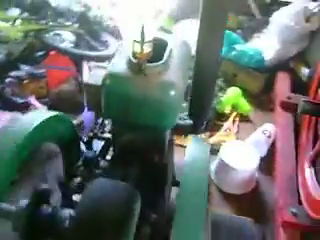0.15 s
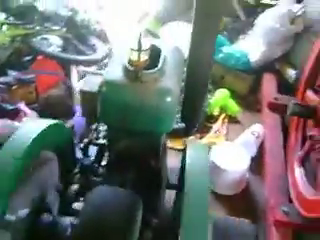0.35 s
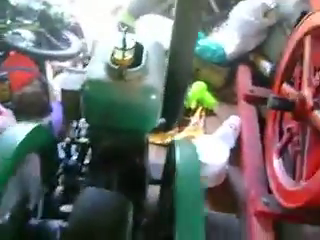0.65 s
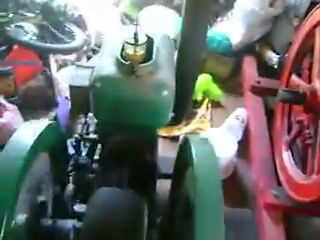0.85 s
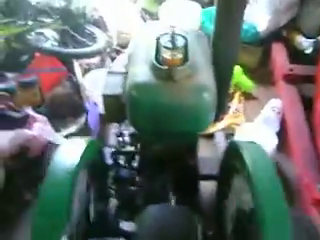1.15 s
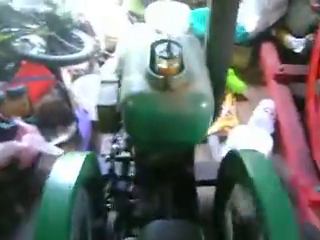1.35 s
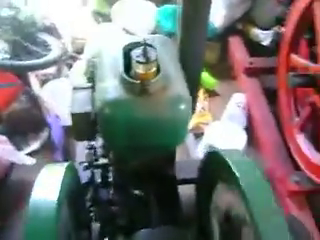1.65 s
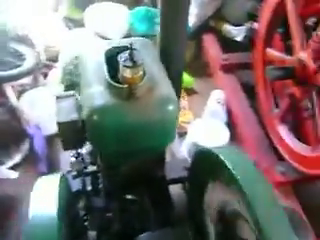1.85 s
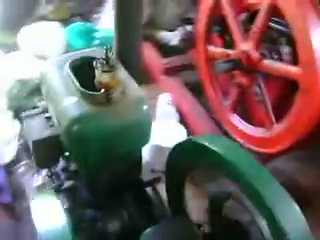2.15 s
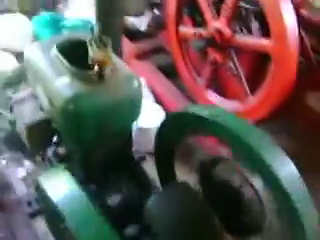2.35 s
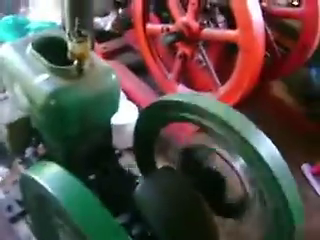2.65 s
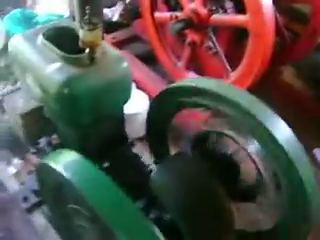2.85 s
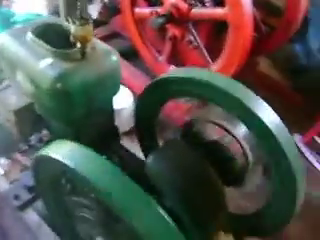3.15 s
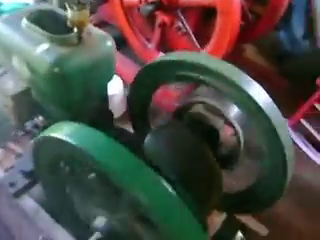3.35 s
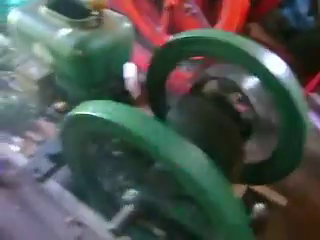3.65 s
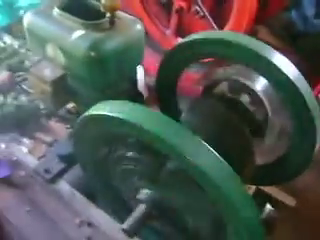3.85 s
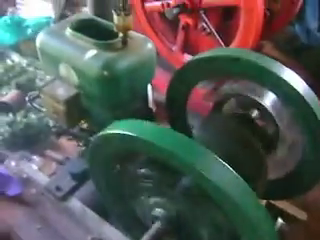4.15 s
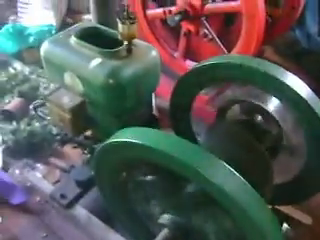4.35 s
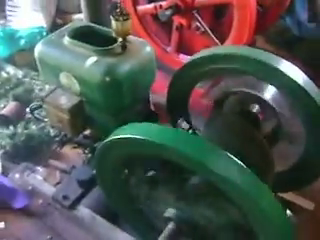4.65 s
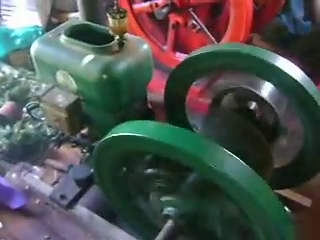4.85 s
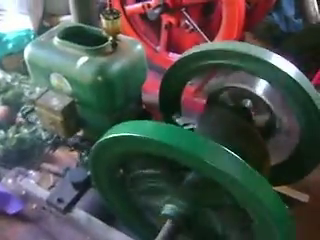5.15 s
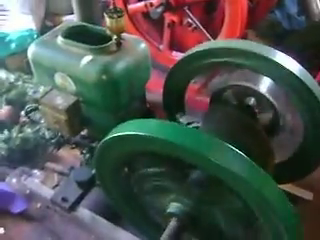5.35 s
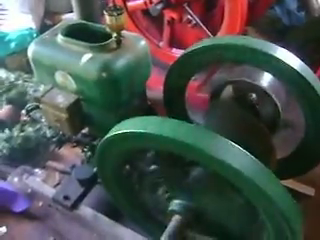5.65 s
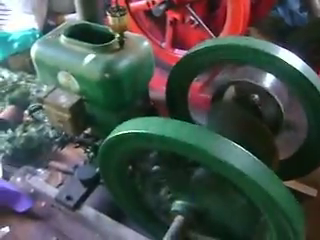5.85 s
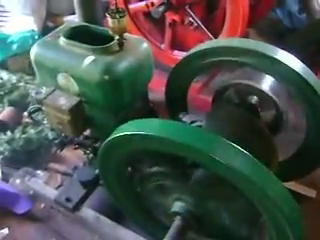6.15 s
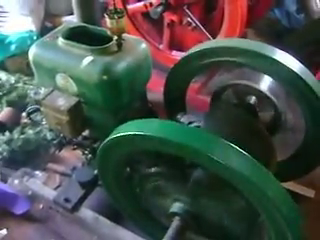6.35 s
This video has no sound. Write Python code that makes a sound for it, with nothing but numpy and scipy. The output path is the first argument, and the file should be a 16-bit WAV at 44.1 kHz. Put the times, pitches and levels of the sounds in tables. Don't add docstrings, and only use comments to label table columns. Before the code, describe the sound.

Steady loose mechanical rattle of a hit-and-miss engine: hollow cast-iron knocks, sharp steel ticks on each cam turn and a low breathing hum. Two times a latch clicks, the intake snorts with fluttering hiss, and a loud exhaust bang cracks, roars and dies within a fraction of a second. Narrow, dull, clipped sound from a small microphone very near the machine, with slight shed echo, moving from behind to the side.

```python
import sys
import numpy as np
from scipy import signal
from scipy.fft import rfft, irfft
from scipy.io import wavfile
from scipy.ndimage import uniform_filter1d

SR = 44100
rng = np.random.default_rng(int(sys.argv[2]) if len(sys.argv) > 2 else 0)


def volts_from_db(level):
    exponent = np.asarray(level, float) / 20
    return 10 ** exponent


def to_wav(sig):
    pcm = np.clip(np.atleast_2d(sig), -1, 1) * 32767
    pcm = np.round(pcm).astype(np.int16)
    wavfile.write(sys.argv[1], SR, pcm.T)


N = 287091
TIME = np.arange(N) / SR

# [f/Hz, width/Hz, level/dB]
HOPPER_MODES = [(714.5, 21, -4), (789, 30, 0.5), (863, 32, -2.5), (920.6, 26, -3), (1014.4, 23, -3.5),
                (1080, 31, -2.5), (1233, 88, -3.5)]
# [f/Hz, width/Hz, level/dB]
LINKAGE_MODES = [(1255, 29, -3), (1447, 44, 1.5), (1706, 190, 1.5), (1897, 120, -2), (2007, 83, -0.5),
                 (2336, 260, -2), (2880, 710, -16)]
# [f/Hz, width/Hz, level/dB]
STEEL_MODES = [(2940, 380, -4), (3504, 370, 1), (3740, 395, 2.5), (3880, 180, 1), (4290, 390, -2),
               (5000, 450, -5.5), (6200, 320, -7.5)]
# [t/s, gear play level/dB, shaking of the iron level/dB]
CAM_TURNS = [(-0.42, 9, -34), (0.033, 6, -37.5), (0.4958, -5, -36.5), (0.9794, -4, -36.5),
             (1.424, 2.5, -34), (1.8288, 3.5, -34), (2.2384, -4.5, -35.5), (2.657, -2, -35),
             (3.084, 4, -37), (3.5205, 4, -38), (3.9655, 3.5, -37.5), (4.4224, -0.5, -39),
             (4.8998, -9, -38), (5.332, -4.5, -37), (5.7364, -1.5, -36), (6.141, 0, -36.5),
             (6.553, -6, -38)]
# [t/s, level/dB, slowness/1]
LATCH_EVENTS = [
    (0.981, -0.5, 1.03),
    (4.8998, -0.5, .98),
]
# [t/s, thud level/dB, hiss level/dB, hush of the iron/dB]
SNORT_COURSE = [(.005, -65.5, -51.5, 0), (.04, -51.5, -50, -0.5), (.078, -48.5, -46, 2),
                (0.104, -55.5, -42, -3), (.168, -53.5, -40, 3.5), (0.201, -59, -50.5, -7.5),
                (.25, -63, -57.5, -0.5), (0.267, -62, -40, 1), (.345, -58, -63, 0)]
# [t/s, first pressure pulse level/dB]
FIRINGS = [
    (1.3457, -6.0),
    (5.2573, -7.5),
]


def rms_one(x):
    return x / np.sqrt(np.mean(x ** 2) + 1e-20)


def in_time(rows):
    s, *columns = np.transpose(rows)
    return [np.interp(TIME, s, c) for c in columns]


def shifted(start_s, rows, slowness=1):
    return [(start_s + slowness * s, *rest) for s, *rest in rows]


def gate(rows, rise_s, fall_s):
    opening = np.clip((TIME - rows[0][0]) / rise_s + 1, 0, 1)
    closing = np.clip((rows[-1][0] - TIME) / fall_s, 0, 1)
    return opening * closing


def drift(rate):
    r = np.exp(-80 * np.pi * rate / SR)
    noise = rng.standard_normal(N // 40 + 2002)
    slow = signal.lfilter([1], [1, -2 * r, r * r], noise)[2000:]
    return np.interp(np.arange(N) / 40, np.arange(len(slow)), rms_one(slow))


def body(force, modes, wander_db):
    out = 0
    for k, (hz, width_hz, level_db) in enumerate(modes):
        r = np.exp(-np.pi * width_hz / SR)
        drive = force * volts_from_db(wander_db * drift(8.0))
        poles = [1, -2 * r * np.cos(2 * np.pi * hz / SR), r * r]
        rung = signal.lfilter([1, 0, -1], poles, drive)
        out = out + (-1) ** k * volts_from_db(level_db) * np.sqrt(1 - r * r) / 2 * rung
    return out


def strength(modes):
    return np.sqrt(np.sum(volts_from_db(2 * np.array(modes)[:, 2])))


def struck(modes, start_s, ring_db, rise_s, flutter_db):
    out, past, i = np.zeros(N), TIME[:SR // 2], round(start_s * SR)
    for (hz, level_db, t60), phase in zip(modes, rng.random(len(modes))):
        decay_db = -60 * past / np.clip(t60, .04, .35)
        fading_db = ring_db + 0.7 * level_db + decay_db + flutter_db * drift(30)[:len(past)]
        rise = np.minimum(past / rise_s, 1) ** 2
        out[i:i + len(past)] += rise * volts_from_db(fading_db) * np.sin(2 * np.pi * (hz * past + phase))
    return out


def contacts(per_s, spread_db):
    sizes = volts_from_db(spread_db * np.minimum(rng.exponential(1, N), 4)) * rng.choice([-1, 1], N)
    return rms_one(sizes * (rng.random(N) < per_s / SR))


def bursts(times, peaks_db, t60, snap):
    out = np.zeros(N)
    for s, peak_db in zip(times, peaks_db):
        i = round(s * SR)
        past = TIME[:min(SR // 6, N - i)]
        out[i:i + len(past)] += volts_from_db(peak_db) * (volts_from_db(-60 * past / t60) + snap * volts_from_db(-60 * past / .02))
    return out


def tooth_force(s, peak_db):
    force = bursts(s, peak_db - 11.5, t60=0.12, snap=0.99) * rng.standard_normal(N) + 1e-9
    force[np.round(s * SR).astype(int)] += volts_from_db(peak_db + 9.5)
    return force


def cam_phase():
    return np.interp(TIME, np.array(CAM_TURNS)[:, 0], np.arange(len(CAM_TURNS)))


def recurring_knocks():
    # [share of the turn/1, level/dB]
    turn_knocks = np.array([(0.198, -33), (0.398, -43.5), (0.521, -32), (.61, -39.5), (0.693, -30.5),
                            (0.795, -32), (0.893, -28.5), (0.999, -25.5)])
    start, play_db, _ = np.transpose(CAM_TURNS)
    s = start[:-1, None] + np.diff(start)[:, None] * turn_knocks[:, 0]
    scatter_db = 1.5 * rng.standard_normal(s.shape)
    db = turn_knocks[:, 1] + play_db[:-1, None] + scatter_db
    heard = (s > .01) & (s < N / SR - .01)
    return s[heard], db[heard]


def shake_db():
    # [share of the turn/1, level/dB]
    bearing_load = [(0, 3), (0.058, 3), (0.149, 0), (.24, 3.5), (0.399, -3), (0.641, -1), (.74, 2.5),
                    (.85, 0.5), (1.001, 2.5)]
    hush = sum(in_time(shifted(s, SNORT_COURSE, slowness))[2] for s, _, slowness in LATCH_EVENTS)
    start, *_, vigour_db = np.transpose(CAM_TURNS)
    middle = start + np.gradient(start) / 2
    load_db = np.interp(cam_phase() % 1, *np.transpose(bearing_load))
    return np.interp(TIME, middle, vigour_db) + load_db + hush


def yard_noise():
    # [f/Hz, level/dB]
    colour_points = np.array([(12, -61), (20, -29.5), (123, -6.5), (236, -13.5), (316, 1.5), (392, -2.5),
                              (773, -4), (1450, -3.5), (2650, -30.5), (4410, -40), (5360, -41), (6500, -69),
                              (8450, -101), (14300, -120)])
    hz = np.maximum(np.fft.rfftfreq(N, 1 / SR), 1)
    colour = volts_from_db(np.interp(np.log(hz), np.log(colour_points[:, 0]), colour_points[:, 1]))
    return volts_from_db(-46) * rms_one(irfft(rfft(rng.standard_normal(N)) * colour, N))


def shed_echo(x):
    t60_s, level_db = 0.31, -26.5
    past = TIME[:SR // 2]
    tail = rng.standard_normal(len(past)) * volts_from_db(-60 * past / t60_s) * (past > .006)
    tail = signal.lfilter([.4], [1, -.6], tail)
    return volts_from_db(level_db) * signal.fftconvolve(x, tail / np.sqrt(np.sum(tail ** 2)))[:N]


def hiss():
    shake = shake_db()
    rubbing = contacts(5000, spread_db=-3.0)
    decay = volts_from_db(-60 * TIME[:SR // 20] / .035)
    dying = np.convolve(np.abs(contacts(90, spread_db=2.0)), decay)[:N]
    chatter = rms_one(dying * rng.standard_normal(N))
    grain = rms_one(body(.7 * rubbing + chatter, STEEL_MODES, wander_db=1))
    swell_s, half_s, swell_db = 3.68, 0.11, 7.5
    level_db = -64.5 + swell_db * np.exp(-((TIME - swell_s) / half_s) ** 2)
    return volts_from_db(level_db + .6 * (shake - np.mean(shake))) * grain


def breath():
    # [first level/dB, its sag/dB, second level/dB, its sag/dB]
    puff_levels = [(-62, 0, -58, 4), (-57.5, -2, -53, 4), (-66, -12, -56.5, -3), (-66, 1, -64, -10.5),
                   (-47, 15, -54.5, 10), (-50, 6, -54, 6), (-50.5, 2, -66.5, 1.5), (-47, 16, -47.5, 3),
                   (-52.5, 0, -52, 9), (-48, 16.5, -50.5, 6), (-60.5, 0, -61, 7), (-62, -7, -58, 3),
                   (-62, 4, -62.5, -4), (-49, 10, -49.5, 23), (-55, 6, -54.5, 1.5), (-51.5, 7, -56, -5)]
    hum_hz, start_turns = 137, 0.14
    rise, end, gap_db = 0.13, 0.89, -21.5
    strokes = np.maximum(2 * (cam_phase() - start_turns), 0)
    level_db, sag_db = np.reshape(puff_levels, (-1, 2))[strokes.astype(int)].T
    share = strokes % 1
    shape_db = np.interp(share, [0, rise, end, 1], [gap_db, 0, 0, gap_db])
    sagging_db = sag_db * np.maximum(share - rise, 0) / (end - rise)
    level = uniform_filter1d(volts_from_db(level_db + shape_db - sagging_db), size=600)
    return np.sqrt(2) * level * np.sin(2 * np.pi * np.cumsum(hum_hz + 2.0 * drift(3.06)) / SR)


def scrapes():
    # [t/s, peak level/dB]
    ring_rubs = [(.05, -43), (2.11, -58), (2.325, -53), (2.54, -57), (2.749, -56), (3.19, -54),
                 (5.411, -43), (5.62, -61.5), (6.012, -53), (6.22, -62), (6.43, -66)]
    # [f/Hz, width/Hz, level/dB]
    bore_modes = [(1970, 330, -1), (2700, 410, 4)]
    s, peak_db = np.transpose(ring_rubs)
    rub = uniform_filter1d(bursts(s, peak_db, t60=0.14, snap=.3), size=200)
    return rms_one(body(contacts(1500, spread_db=4.0), bore_modes, wander_db=4.5)) * rub


def blooms():
    # [t/s, f/Hz, level/dB]
    swelling_modes = [(0.066, 528, -30.5), (.14, 329.4, -37.5), (.374, 804, -34), (.504, 697, -34.5),
                      (.534, 555, -26.5), (.853, 781, -31.5), (1.043, 705, -30.5), (1.117, 608, -28.5),
                      (1.165, 1924, -37.5), (1.537, 629, -28.5), (1.542, 348, -32.5), (1.711, 820, -32.5),
                      (1.719, 347, -30), (1.741, 611, -29.5), (1.845, 308, -38), (2.15, 489, -29),
                      (2.549, 490, -31), (2.689, 710, -30.5), (2.759, 608, -27.5), (2.779, 490, -30),
                      (3.199, 492, -26), (3.402, 493, -31), (3.627, 807, -32.5), (3.856, 509, -36.5),
                      (5.428, 610, -30.5), (5.434, 1130, -31), (5.622, 638, -33.5), (6.046, 495.3, -31),
                      (6.231, 585, -31), (4.54, 806, -34.5)]
    out, past = np.zeros(N + SR), TIME[:SR // 5]
    swell = (past / 0.034) ** 2 * np.exp(2 - 2 * past / 0.025)
    for (s, hz, level_db), phase in zip(swelling_modes, rng.random(len(swelling_modes))):
        i = max(round((s - .028) * SR), 0)
        out[i:i + len(past)] += volts_from_db(level_db + 1.5) * swell * np.sin(2 * np.pi * (hz * past + phase))
    return out[:N]


def rattle():
    # [t/s, peak level/dB]
    heavy_knocks = [(.06, -41), (0.919, -21), (0.981, -17.5), (1.028, -17.5), (1.14, -19), (1.259, -21),
                    (1.349, -23), (1.497, -22), (1.535, -21), (2.32, -26), (2.523, -39), (2.615, -23.5),
                    (3.037, -21.5), (3.071, -23), (3.386, -33), (3.475, -27.5), (3.833, -27.5),
                    (4.421, -22), (4.666, -31), (4.716, -40), (4.898, -27), (4.944, -20.5), (5.264, -6),
                    (5.835, -34.5), (6.223, -27), (4.376, -36.5), (5.617, -30), (5.418, -16), (3.522, -38),
                    (6.017, -25)]
    # [t/s, peak level/dB]
    light_knocks = [(0.283, -29), (0.399, -34), (0.45, -27), (0.5, -25), (0.68, -37), (0.81, -33),
                    (1.081, -27), (1.615, -28), (1.706, -29), (1.835, -23), (1.918, -26), (2.408, -26),
                    (2.445, -22), (2.672, -22), (2.744, -30), (2.857, -15), (2.922, -32), (3.113, -19),
                    (3.19, -33), (3.598, -18), (3.855, -23), (3.918, -39.5), (3.971, -28), (4.064, -17),
                    (4.185, -30), (4.297, -21), (4.746, -23.5), (4.793, -28), (4.834, -36), (5.065, -21),
                    (5.547, -35.5), (5.662, -16.5), (5.81, -32), (6.1, -16), (6.339, -39)]
    # [f/Hz, width/Hz, level/dB]
    skid_modes = [(238, 287, -0.5), (317.6, 42, 1), (332, 21.3, 3), (347, 130, -2)]
    # [f/Hz, width/Hz, level/dB]
    flywheel_modes = [(439.2, 43, -4.5), (504, 15, -2.5), (554, 19, -1), (610, 7.4, -1), (674, 65, -3.5)]
    # [t/s, share of the way/1]
    walk_course = [(0, 0.15), (1.0, 0.35), (2.0, 0.077), (3.0, 0.14), (4.0, 0.7), (5.0, 0.9), (6.5, 0.52)]
    # [level from behind/dB, level from the side/dB]
    radiation = [
        (-7, -7.5),
        (-6.5, -8),
        (-10, -2.5),
        (-14, -19.5),
    ]
    slack_s, loss_db = 0.014, 12.5
    listed = np.hstack([np.transpose(heavy_knocks), np.transpose(light_knocks) - [[0], [10]]])
    s, peak_db = np.hstack([listed, recurring_knocks()])

    crossing = np.bincount(np.round((listed[0] - 3.0 * slack_s) * SR).astype(int), minlength=N)[:N]
    lead_swell_db = 0.5 * signal.fftconvolve(crossing, np.hanning(round(2 * slack_s * SR)))[:N]
    chuffs = bursts(s - .002, peak_db - loss_db, t60=0.074, snap=1.5)
    force = volts_from_db(shake_db() + 2.5 + lead_swell_db) + chuffs
    blows = np.zeros(N)
    blow_db = np.minimum(listed[1], -24) - loss_db + 11
    blows[np.round((listed[0] - .002) * SR).astype(int)] = volts_from_db(blow_db)

    out, (way,) = 0, in_time(walk_course)
    castings = (skid_modes, flywheel_modes, HOPPER_MODES, LINKAGE_MODES)
    rates = (1200, 1200, 900, 450)
    for modes, (behind_db, side_db), per_s in zip(castings, radiation, rates):
        shaking = contacts(per_s, spread_db=2.0)
        level = volts_from_db(behind_db + way * (side_db - behind_db))
        out = out + level * body(force * shaking + blows, modes, wander_db=2.0) / strength(modes)
    return out


def ticks():
    # [t/s, peak level/dB]
    latch_ticks = [(0.9813, -24), (1.0056, -25.5), (1.073, -26.5), (1.104, -31), (1.1437, -27.5),
                   (1.243, -27.5), (1.269, -28), (1.297, -34), (1.342, -27), (1.424, -40), (4.8978, -23.5),
                   (4.919, -26.5), (4.985, -27), (5.1582, -40), (5.19, -37), (5.252, -27), (5.332, -40.5)]
    # [t/s, peak level/dB]
    teeth_before = [(0.0323, -27.5), (0.1271, -52), (0.2733, -40.5), (0.321, -41.5), (0.3516, -59),
                    (0.402, -43), (0.443, -46), (0.495, -26), (0.5926, -51), (0.7028, -54), (0.74, -41.5),
                    (0.822, -59.5), (0.8804, -45.5), (0.9156, -48)]
    # [t/s, peak level/dB]
    teeth_between = [(1.6441, -55.5), (1.718, -45), (1.7903, -38), (1.8292, -29.5), (1.9145, -48),
                     (1.9938, -49), (2.0343, -60), (2.0732, -51), (2.1096, -51), (2.1545, -33.5),
                     (2.1949, -39), (2.2388, -33.5), (2.2802, -46), (2.3216, -55), (2.4064, -45.5),
                     (2.4658, -58), (2.4882, -52), (2.5256, -55), (2.5805, -48), (2.6119, -45),
                     (2.6578, -31.5), (2.7451, -45.5), (2.8274, -45), (2.8639, -40), (3.006, -42),
                     (3.0315, -36), (3.0844, -31.5), (3.1672, -50), (3.2116, -48), (3.26, -48),
                     (3.3133, -43), (3.3453, -43.5), (3.3867, -58), (3.4306, -51), (3.474, -42),
                     (3.5204, -30), (3.5762, -49), (3.6067, -56), (3.7533, -47.5), (3.7987, -40.5),
                     (3.8835, -48), (3.918, -51), (3.9654, -32), (4.0976, -55.5), (4.2038, -43),
                     (4.2482, -42), (4.2986, -47), (4.325, -44), (4.3724, -48.5), (4.4223, -31.5),
                     (4.6054, -53), (4.6648, -46), (4.7107, -41), (4.801, -50), (4.8414, -48),
                     (4.8813, -49)]
    # [t/s, peak level/dB]
    teeth_after = [(5.6155, -51), (5.6606, -40.5), (5.6923, -50), (5.7358, -32.5), (5.897, -47),
                   (5.9537, -58), (5.978, -53), (6.0121, -56), (6.0574, -45), (6.1028, -50), (6.1407, -34),
                   (6.1852, -47.5), (6.219, -61), (6.3044, -46), (6.3648, -57), (6.3887, -56)]
    teeth = np.transpose(teeth_before + teeth_between + teeth_after) + [[0], [5]]
    s, peak_db = np.hstack([np.transpose(latch_ticks), teeth])
    steel = body(tooth_force(s, peak_db), STEEL_MODES, wander_db=1.5) / strength(STEEL_MODES)
    knocks = tooth_force(s, peak_db - 8 * (peak_db < -34))
    iron = body(knocks, HOPPER_MODES[3:] + LINKAGE_MODES, wander_db=3.0) / strength(LINKAGE_MODES)
    return steel + volts_from_db(-3.0) * iron


def snorts():
    # [f/Hz, width/Hz, level/dB]
    intake_modes = [(2070, 1100, -3.5), (3320, 130, -1), (3900, 1800, -1), (4580, 220, -1),
                    (5440, 2700, -4)]
    out, air = 0, rms_one(body(contacts(2500, spread_db=3), intake_modes, wander_db=.3))
    flutter_hz = 102 * (1 + 0.021 * drift(15.0))
    turn = 2 * np.pi * np.cumsum(flutter_hz) / SR
    for s, level_db, slowness in LATCH_EVENTS:
        rows = shifted(s, SNORT_COURSE, slowness)
        thud_db, hiss_db, _ = in_time(rows)
        thud = np.sqrt(2) * volts_from_db(thud_db) * np.sin(turn)
        chopped = volts_from_db(hiss_db) * air * (1 + 0.15 * np.cos(turn))
        out = out + gate(rows, 0.0036, 0.013) * volts_from_db(level_db) * (thud + chopped)
    return out


def shell():
    # [f/Hz, level/dB, T60/s]
    shell_first = [(1620, -2.5, 0.11), (1680, -15, 0.32), (1670, -12.5, 0.51), (1840, -7.5, 0.13),
                   (2880, -12.5, 0.45), (3000, -3.5, 0.15), (3600, -0.5, 0.21), (3752, 1.5, 0.13),
                   (4102, -12.5, 0.4), (4120, -8, 0.12), (4797, -4.5, 0.13), (5044, -8.5, 0.17)]
    # [f/Hz, level/dB, T60/s]
    shell_second = [(1590, -2.5, 0.32), (1650, -10, 1.7), (2180, -23, 0.16), (3140, -6.5, 0.14),
                    (3600, -16.5, 0.26), (3900, -10, 0.39), (3700, -11.5, 0.22), (4237, -4.5, 0.066),
                    (4500, -9, 0.12), (4600, -2, 0.077), (5500, -5.5, 0.13), (5200, -22.5, 0.36)]
    # [f/Hz, level/dB, T60/s]
    cap_modes = [(3390, 0.5, .14), (3200, -5, 0.14), (3670, -2.5, 0.1), (1900, -3.5, .14),
                 (1538, -3.5, .16)]
    out = 0
    firings = zip(FIRINGS, (shell_first, shell_second), (-24, -21.5), (-21, -32))
    for (s, _), modes, ring_db, cap_db in firings:
        out = out + struck(modes, s + .006, ring_db, 0.0046, 4.0)
        out = out + struck(cap_modes, s + 0.0056, cap_db, 0.0035, 1.5)
    return out


def throbs():
    # [t/s, fundamental level/dB, second harmonic level/dB, crack level/dB]
    throb_course = [(0.016, -48, -21, -35), (0.041, -39.5, -35.5, -52), (0.075, -35.5, -33.5, -55),
                    (0.108, -29, -44, -36), (.141, -39, -41.5, -56), (.181, -53, -54, -38)]
    out = 0
    for (s, _), phase in zip(FIRINGS, (0.28, 0.32)):
        rows = shifted(s, throb_course)
        first_db, second_db, crack_db = in_time(rows)
        hz = np.interp(TIME - s, [0, .11], [66.0, 95.6])
        turn = 2 * np.pi * (np.cumsum(hz * (TIME > s)) / SR + phase)
        slap = np.exp(10.0 * (np.cos(turn) - 1)) * (TIME > s)
        crack = signal.sosfilt(signal.butter(2, [250, 1300], "band", fs=SR, output="sos"), slap)
        crack = crack / np.std(crack[TIME > s])
        note = volts_from_db(first_db) * np.cos(turn) + volts_from_db(second_db) * np.cos(2 * turn)
        out = out + gate(rows, .01, .02) * (np.sqrt(2) * note + volts_from_db(crack_db) * crack)
    return out


def pipe():
    # [f/Hz, level/dB, T60/s]
    pipe_first = [(296, -16, 0.13), (397, -24, 0.23), (608, -6, 0.13), (700, -13, 0.11), (930, -15.5, 0.15),
                  (1160, 2.5, 0.14)]
    # [f/Hz, level/dB, T60/s]
    pipe_second = [(299, -9.5, 0.15), (381, -15, 0.4), (452, -11.5, 0.07), (705, 3, 0.094),
                   (813, -5.5, 0.17), (903, -9.5, 0.23), (1004, -5.5, 0.093), (1140, -16, 0.28),
                   (1276, -16.5, 0.15)]
    # [t/s, level/dB, sign/1]
    end_slams = [(1.3528, -1, -1), (1.3575, -4, 1), (1.3645, -3, -1), (1.3725, -8, 1), (5.2672, 2, 1),
                 (5.2752, 2.5, -1), (5.2882, -1.5, -1)]
    # [f/Hz, width/Hz, level/dB]
    wash_modes = [(1486, 800, 1.5), (2620, 1200, 2.5), (4320, 1800, -6.5)]
    out, wash = 0, rms_one(body(contacts(2000, spread_db=3), wash_modes, wander_db=2))
    firings = zip(FIRINGS, (pipe_first, pipe_second), (-9.5, -13.5), (-24, -18.5))
    for (s, _), modes, ring_db, wash_db in firings:
        past = np.clip(TIME - s, 0, 1)
        rise = np.minimum(past / 0.023, 1) ** 2
        out = out + volts_from_db(wash_db - 60 * past / 0.29) * rise * wash
        out = out + struck(modes, s, ring_db, 0.0039, 1.5)
    for s, level_db, sign in end_slams:
        late = np.clip((TIME - s) / .0003, -9, 9)
        out = out + sign * volts_from_db(level_db) * (1 - late ** 2) * np.exp(-late ** 2 / 2)
    return out


def trapped(x):
    return signal.lfilter(*signal.iirnotch(2470, 2470 / 270, fs=SR), x)


def blasts():
    # [f/Hz, width/Hz, level/dB]
    silencer_low = [(323.4, 34, -6.5), (410, 19, -14), (589, 24, -5), (720, 150, 1), (944, 270, -1.5),
                    (1197, 90, -4.5)]
    # [f/Hz, width/Hz, level/dB]
    silencer_middle = [(1516, 150, 1.5), (1917, 110, 2), (2300, 240, -10)]
    # [f/Hz, width/Hz, level/dB]
    silencer_high = [(2906, 300, -4), (3080, 120, -2), (3300, 140, -2), (3650, 320, -1)]
    # [f/Hz, width/Hz, level/dB]
    silencer_top = [(4150, 650, 0.5), (4850, 380, -2.5), (5190, 250, -7), (6150, 260, -3.5)]
    # [low level/dB, middle level/dB, shell level/dB, baffle level/dB, top level/dB]
    section_levels = [(-13, -15.5, -16, -12, -16), (-13, -22.5, -15.5, -28, -16.5)]
    # [peak t/s, hold/s, T60/s, tail level/dB, tail T60/s]
    blowdown = [
        (0.014, 0.015, 0.16, -17.5, 0.74),
        (0.0083, 0.0072, 0.22, -23, 0.29),
        (0.005, 0.0068, 0.15, -23, 0.34),
        (0.0094, 0.0053, 0.14, -17.5, 0.39),
        (0.017, 0.014, .12, -21, 0.34),
    ]
    # [roar lag/s, stretch of its hold/1]
    valve_timing = [(0.0014, 0.66), (0.0005, 0.96)]
    out, opens_s = 0, 0.0013
    sections = (silencer_low, silencer_middle, silencer_high[:3], silencer_high[3:], silencer_top)
    for modes, levels_db, course in zip(sections, np.transpose(section_levels), blowdown):
        peak_s, hold_s, t60, tail_db, tail_t60 = course
        roar = rms_one(body(contacts(2200, spread_db=3), modes, wander_db=1))
        gusts_db = 1.5 * drift(50.0)
        for (fired_s, _), level_db, (lag_s, stretch) in zip(FIRINGS, levels_db, valve_timing):
            s = fired_s + lag_s
            rise = np.clip((TIME - s - opens_s) / (peak_s - opens_s), 0, 1) ** 1.7
            past = np.maximum(TIME - s - peak_s - stretch * hold_s, 0)
            decay = volts_from_db(-60 * past / t60) + volts_from_db(tail_db + gusts_db - 60 * past / tail_t60)
            out = out + volts_from_db(level_db) * rise * decay * roar
    return out


def shots():
    out = 0
    for s, level_db in FIRINGS:
        phase = np.clip((TIME - s) / .0036, 0, 30)
        envelope = np.minimum(phase / .3, 1) * volts_from_db(-6 * phase)
        out = out - volts_from_db(level_db + 2) * np.sin(2 * np.pi * phase) * envelope
    return out


def scene():
    steady = yard_noise() + hiss() + breath() + blooms() + rattle() + snorts() + throbs()
    sharp = ticks() + shots()
    exhaust = trapped(blasts() + pipe()) + shell()
    return (sharp + shed_echo(sharp) + steady + exhaust + scrapes())[None]


def top_cut(x):
    return signal.sosfilt(signal.butter(12, 15760, fs=SR, output="sos"), x)


def record(dry):
    ceiling, cutoff_hz, self_noise_db = .738, 6430, -107.0
    rounded = 1.08 * ceiling * np.tanh(dry / (1.08 * ceiling))
    sloped = signal.sosfilt(signal.butter(5, 5300, fs=SR, output="sos"), rounded)
    narrow = signal.sosfilt(signal.cheby2(14, 78, cutoff_hz * 1.057, fs=SR, output="sos"), sloped)
    clipped = np.clip(narrow, -ceiling, ceiling)
    finished = clipped + volts_from_db(self_noise_db) * rng.standard_normal(dry.shape)
    return top_cut(finished)


dry = scene()
out = record(dry)
to_wav(out)
```